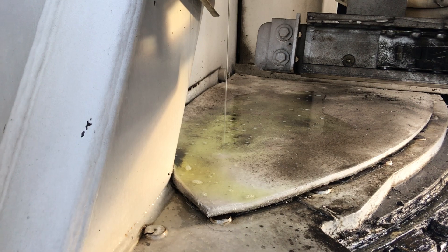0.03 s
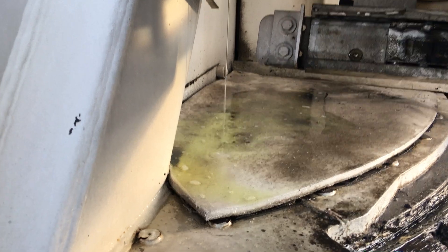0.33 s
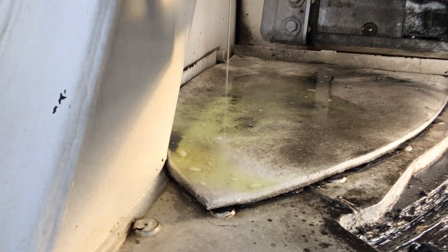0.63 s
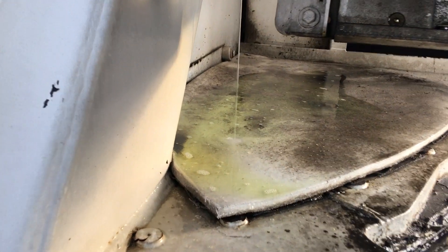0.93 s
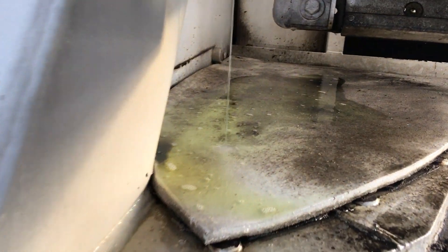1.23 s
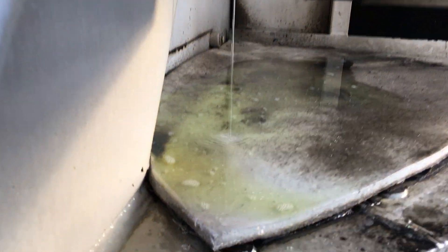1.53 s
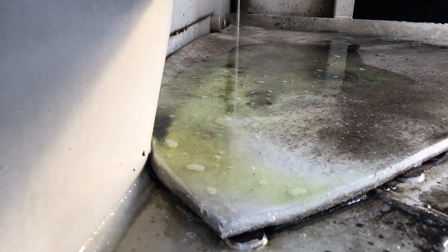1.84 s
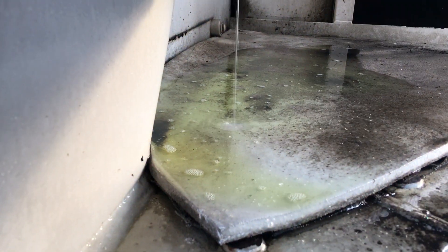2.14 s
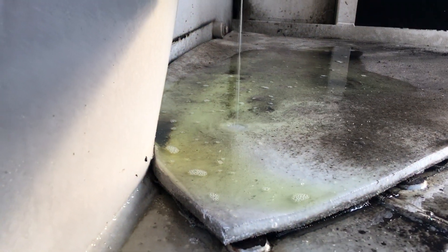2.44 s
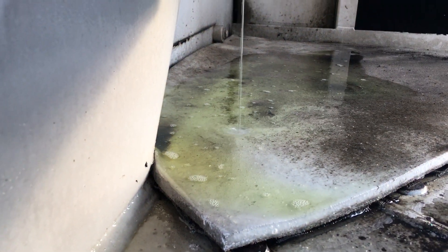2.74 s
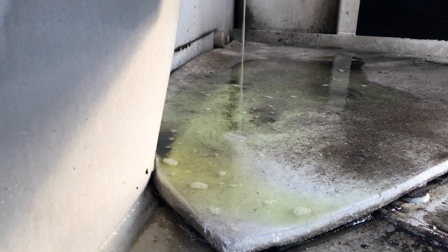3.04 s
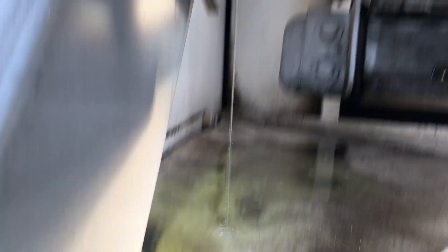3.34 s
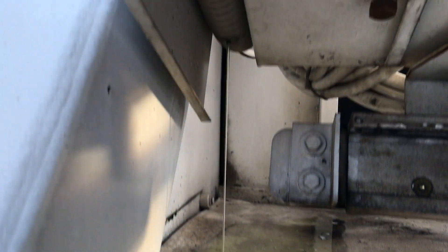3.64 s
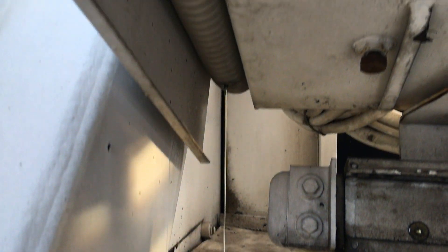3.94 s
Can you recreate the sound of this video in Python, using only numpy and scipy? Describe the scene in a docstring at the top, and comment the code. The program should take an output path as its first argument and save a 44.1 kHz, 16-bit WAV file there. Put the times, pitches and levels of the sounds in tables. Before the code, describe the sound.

Close diesel engine droning and clattering, joined midway by a sudden, lasting hiss of air.

```python
"""From the start, a six-cylinder diesel holds a fast idle, heard close up in its open engine bay.
Its firings drone, its parts clatter much the same way every cycle, an air compressor throbs,
a pump whines and cooling air rushes. Soon faint squeaks come and go, and a thin leak ticks on a tray.
At about 2.4 s the compressor unloads: a valve opens with a low puff, and air hisses out
to the end, slowly losing pressure while the engine runs on."""
import sys
import numpy as np
from scipy import signal
from scipy.fft import rfft, irfft
from scipy.io import wavfile
from scipy.ndimage import uniform_filter1d, map_coordinates

SR = 44100
rng = np.random.default_rng(int(sys.argv[2]) if len(sys.argv) > 2 else 0)


def waveform_to_disk(signal):
    """Save audio, clipped to [-1, 1], as 16-bit WAV at the path in sys.argv[1]."""
    frames = np.transpose(np.atleast_2d(signal))
    scaled = np.clip(frames, -1, 1) * 32767
    samples = np.round(scaled).astype(np.int16)
    wavfile.write(sys.argv[1], SR, samples)


N = 176400

CYLINDERS, CYCLE_HZ, COMPRESSOR_HZ, PUMP_HZ = 6, 8.33, 23.15, 222.15
FIRST_CYCLE_S, FIRST_STROKE_S = 0.001, 0.0144
SHAFT_JITTER_S, SPEED_WANDER_S = .00007, 0.00021  # how far the shafts run early or late
CLATTER_DB, REPEAT_SHARE, KNOCK_DEPTH, KNOCK_S, PATTERN_DB = -26, 0.58, .3, 0.0032, 1.4
VALVE_S, HISS_ATTACK_S, HISS_HOLD_S, HISS_DB = 2.406, 0.018, 0.34, -29.5
SAG_LOW_DB_PER_S, SAG_HIGH_DB_PER_S, HISS_SPLIT_HZ = 3.5, 9.5, 9500
AIR_DB, SQUEAK_S = -40, 0.026
BAY_DECAY_S, BAY_DB = 0.0094, -7.5
START_S, TOP_HZ = .084, 15750

# tones of the firing drone: multiple_of_cycle_rate, level_db
DRONE_TONES = [(6, -28.1), (9, -31.7), (12, -33.2), (13, -39), (27, -45), (28, -39), (30, -39), (48, -47.5),
               (99, -45), (100, -44), (111, -48), (118, -49), (122, -45), (135, -47), (144, -46),
               (166, -49), (192, -48.5), (240, -49), (250, -52), (264, -50)]
# tone colour of the rattling block and covers: frequency_hz, relative_db
CLATTER_COLOUR = [(25, -26), (45, 0), (100, 3.5), (165, -1), (245, 1.5), (285, -4), (370, -6), (520, -8.5),
                  (740, -9.5), (850, -4.5), (1100, -9), (1300, -9.5), (1600, -10.5), (1850, -13),
                  (2200, -16), (2400, -17), (3000, -20.5), (3800, -28), (5000, -37), (9000, -60)]
# borders between the low, middle and high clatter: frequency_hz
CLATTER_BORDERS_HZ = [1300, 1600]
# parts struck once a cycle: delay_s, pitch_hz, width_hz, decay_s, level_db
STRUCK_PARTS = [(.0005, 2020, 100, 0.0099, -45.5), (.018, 2228, 130, 0.037, -50),
                (0.041, 950, 300, .004, -47.5), (.055, 1053, 340, 0.021, -41),
                (0.061, 242.7, 55.4, .017, -38), (.073, 970, 298, 0.018, -42)]
# tones of the compressor: multiple_of_shaft_rate, pumping_db, unloaded_db
COMPRESSOR_TONES = [(2, -35.5, -37), (4, -33.5, -32), (5, -36.5, -29), (7, -40, -46), (10, -40.5, -37),
                    (15, -43.5, -50)]
# tone colour of the escaping air: frequency_hz, relative_db
HISS_COLOUR = [(2500, -15), (4200, -7.5), (4900, -9.5), (5400, -6), (6250, -1), (6900, -2), (7600, -7),
               (8700, -1), (9700, -2), (10450, -5), (11000, -1), (12000, 0), (14500, 3), (15800, -2.5)]
# tones of the pump: multiple_of_tooth_rate, level_db
PUMP_TONES = [(1, -44), (2, -44.5), (6, -46), (7, -47), (10, -54)]
# tone colour of the cooling air: frequency_hz, relative_db
AIR_COLOUR = [(2000, -3.5), (3500, 1.5), (3950, 1.5), (4200, 8), (4500, -3.5), (4950, -5), (5900, 1),
              (6700, -1), (7500, -5.5), (9400, -2), (10400, -7), (11300, -3.5), (13000, -3), (15800, -6.5)]
# squeaks, as of a belt: peak_s, level_db
SQUEAK_EVENTS = [(0.353, -44), (.725, -42.5), (1.93, -47), (2.13, -43)]
# splashes of the leak: start_s, level_db
SPLASH_EVENTS = [(.84, -40), (1.592, -41), (1.635, -40), (2.379, -42)]
# level changes with nearness to the engine: time_s, clatter_and_pump_db, cooling_air_db
NEARNESS_GAINS = [(0, -1.5, -0.5), (.6, -1.5, 0), (1.2, -.3, 0.2), (1.902, 0.5, 1), (2.6, .5, 0.3),
                  (3.3, 0.9, -0.5), (4, 0.1, 0.5)]
# low middle of the clatter and pump as the listener moves: time_s, gain_db
LOW_MIDDLE_GAINS = [(0, 2), (1, -0.5), (1.9, 2), (2.8, -0.5), (3.5, -3.5), (4, -2.5)]
# edges of that low middle band: bottom_hz, top_hz
LOW_MIDDLE_EDGES_HZ = [290, 736]


def drone(turns):
    """The firings blend into a low tone; uneven cylinders add more tones above it."""
    return sum(undb(db) * shaft_tone(turns, multiple, waver_db=np.interp(multiple, [6, 100], [.6, 2.2]))
               for multiple, db in DRONE_TONES).imag


def clatter(turns):
    """Each firing and rounds of small knocks shake the block; a few parts ring once a cycle."""
    since_firing = (turns * CYLINDERS) % 1 / (CYLINDERS * CYCLE_HZ)
    kicks = 1 + KNOCK_DEPTH * fade(since_firing, KNOCK_S)
    rest = colour(kicks * repeating_noise(turns, REPEAT_SHARE), CLATTER_COLOUR)
    block = 0
    for hz in CLATTER_BORDERS_HZ:  # each band knocks in its own pattern
        band = below(rest, hz)
        block = block + band * knocks(turns)
        rest = rest - band
    out = undb(CLATTER_DB) * unit(block + rest * knocks(turns))
    for delay, hz, width, decay, db in STRUCK_PARTS:
        age = (turns - delay * CYCLE_HZ) % 1 / CYCLE_HZ
        strike = fade(age, decay) * repeating_noise(turns, share=0.92)
        out = out + undb(db) * ring(strike, hz, width)
    return out


def knocks(turns):
    """A loudness pattern of stronger and weaker knocks, the same on every cycle."""
    places = np.linspace(0, 1, 48, endpoint=False)
    return undb(PATTERN_DB * np.interp(turns, places, rng.standard_normal(48), period=1))


def compressor(clock, t):
    """The compressor's strokes make a throb, which changes colour once the valve opens."""
    turns = (clock - FIRST_STROKE_S) * COMPRESSOR_HZ
    unloaded = np.clip((t - VALVE_S) / 0.68, 0, 1)
    return sum(undb(on_db + (off_db - on_db) * unloaded) * shaft_tone(turns, multiple, waver_db=-0.95)
               for multiple, on_db, off_db in COMPRESSOR_TONES).real


def valve(t):
    """Air escapes with a low puff and a hiss whose top fades first as the pressure falls."""
    age = t - VALVE_S
    jet = colour(bay_echoes(noise()), HISS_COLOUR)
    low = below(jet, HISS_SPLIT_HZ)
    draining_s = np.maximum(age - HISS_HOLD_S, 0)
    hiss = low * undb(-SAG_LOW_DB_PER_S * draining_s)
    hiss += (jet - low) * undb(-SAG_HIGH_DB_PER_S * draining_s)
    puff = undb(-23) * fade(age, decay_s=0.096) * ring(noise(), hz=172, width_hz=130)
    opening = np.clip(age / HISS_ATTACK_S, 0, 1)
    return opening * (undb(HISS_DB + 0.088 * wander(26)) * hiss + puff)


def pump(clock):
    """The teeth of a gear pump make a thin whine."""
    return sum(undb(db) * shaft_tone(clock * PUMP_HZ, multiple, waver_db=2.5)
               for multiple, db in PUMP_TONES).real


def cooling_air():
    """Cooling air rushes steadily, with a slight flutter."""
    rush = bay_echoes(noise()) * undb(0.49 * wander(150))
    return undb(AIR_DB) * colour(rush, AIR_COLOUR) * undb(0.16 * wander(8.7))


def squeaks(t):
    """A high, narrow ring swells briefly, like a squeaking belt."""
    swells = sum(undb(db) * np.exp(-((t - at) / SQUEAK_S) ** 2) for at, db in SQUEAK_EVENTS)
    return swells * ring(noise(), hz=4090, width_hz=130)


def splashes(t):
    """The leak hits the wet tray with faint, bright ticks."""
    hits = sum(undb(db) * fade(t - at, decay_s=0.0039) for at, db in SPLASH_EVENTS)
    return hits * ring(noise(), hz=9700, width_hz=1800)


def bay_echoes(x):
    """Close steel walls add many quick echoes that ripple the treble."""
    age = np.arange(SR // 20) / SR
    echoes = rng.standard_normal(len(age)) * fade(age, BAY_DECAY_S)
    return x + undb(BAY_DB) * signal.fftconvolve(x, echoes / np.linalg.norm(echoes))[:N]


def shaft_tone(turns, multiple, waver_db):
    """A tone at a multiple of a shaft's rate, wavering in level; .real or .imag gives the wave."""
    offset = rng.random() * (multiple > 2 * CYLINDERS)  # low tones stay in step with the stroke
    tone = np.sqrt(2) * np.exp(2j * np.pi * (round(multiple) * turns + offset))
    return tone * undb(waver_db * wander(4.95))


def repeating_noise(turns, share):
    """Noise of which a share comes back on every engine cycle."""
    size = int(SR / CYCLE_HZ)
    same = map_coordinates(rng.standard_normal(size), [turns % 1 * size], order=3, mode="grid-wrap")
    return np.sqrt(share) * same + np.sqrt(1 - share) * noise()


def undb(db):
    """Turn decibels into a gain."""
    return 10 ** (np.asarray(db) / 20)


def unit(x):
    """Scale to an average (rms) level of 1."""
    return x / np.sqrt(np.mean(x ** 2))


def noise():
    """White noise."""
    return rng.standard_normal(N)


def wander(rate_hz):
    """A smooth random drift, about 1 in size."""
    step = int(SR / rate_hz)
    stairs = np.repeat(rng.standard_normal(N // step + 1), step)
    return 1.286 * uniform_filter1d(uniform_filter1d(stairs, step), step)[:N]


def colour(x, points):
    """Shape a sound with a tone colour table; comes out at level 1."""
    hz, db = np.array(points, float).T
    bins_hz = np.maximum(np.arange(N // 2 + 1) * SR / N, 1)
    gain = undb(np.interp(np.log(bins_hz), np.log(hz), db))
    return unit(irfft(rfft(x) * gain, N))


def ring(x, hz, width_hz):
    """Make a sound ring around one pitch; comes out at level 1."""
    b, a = signal.iirpeak(hz, hz / width_hz, fs=SR)
    return unit(signal.lfilter(b, a, signal.lfilter(b, a, x)))


def fade(age, decay_s):
    """Start suddenly at age 0, then die away."""
    return (age >= 0) * np.exp(-np.maximum(age, 0) / decay_s)


def below(x, hz):
    """The part of a sound under a frequency."""
    return signal.sosfiltfilt(signal.butter(2, hz, fs=SR, output="sos"), x)


def scene():
    """All shafts share one slightly unsteady speed; everything sits in the centre."""
    t = np.arange(N) / SR
    clock = t + SHAFT_JITTER_S * wander(25) + SPEED_WANDER_S * wander(1.5)
    turns = (clock - FIRST_CYCLE_S) * CYCLE_HZ  # engine cycles so far
    at, body_db, air_db = np.array(NEARNESS_GAINS).T
    body = (clatter(turns) + pump(clock)) * undb(np.interp(t, at, body_db))
    low_middle = below(body, LOW_MIDDLE_EDGES_HZ[1]) - below(body, LOW_MIDDLE_EDGES_HZ[0])
    low_middle_gain = undb(np.interp(t, *np.array(LOW_MIDDLE_GAINS).T))
    body = body + low_middle * (low_middle_gain - 1)
    air = cooling_air() * undb(np.interp(t, at, air_db))
    mono = drone(turns) + compressor(clock, t) + body + air + squeaks(t) + splashes(t) + valve(t)
    return np.array([mono, mono])


def record(dry):
    """The sound starts after a moment of silence; the highest treble is cut steeply."""
    fade_in = np.clip((np.arange(N) / SR - START_S) / .001, 0, 1)
    return signal.sosfilt(signal.ellip(12, .1, 90, TOP_HZ, fs=SR, output="sos"), dry * fade_in)


dry = scene()
out = record(dry)
waveform_to_disk(out)
```